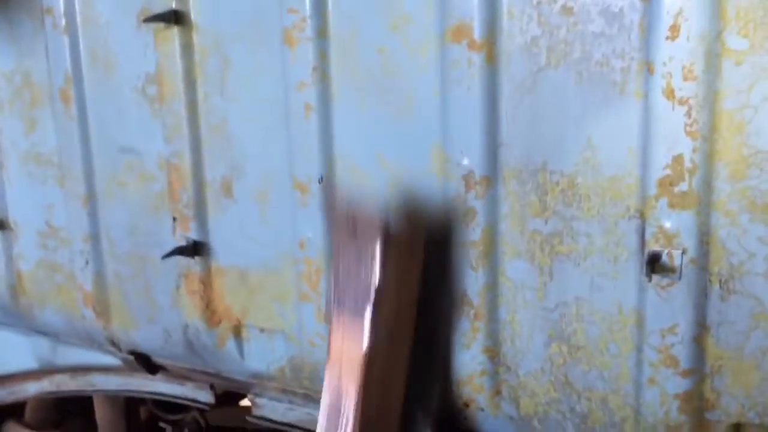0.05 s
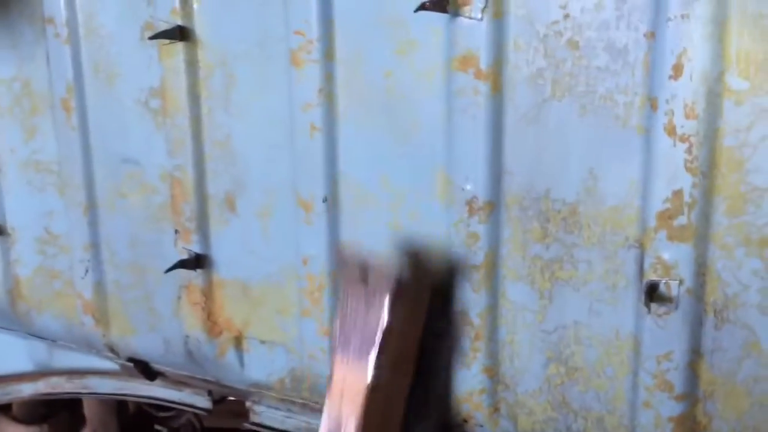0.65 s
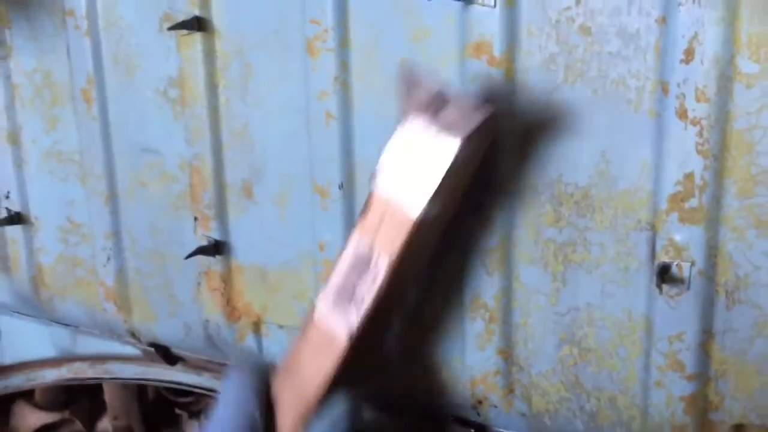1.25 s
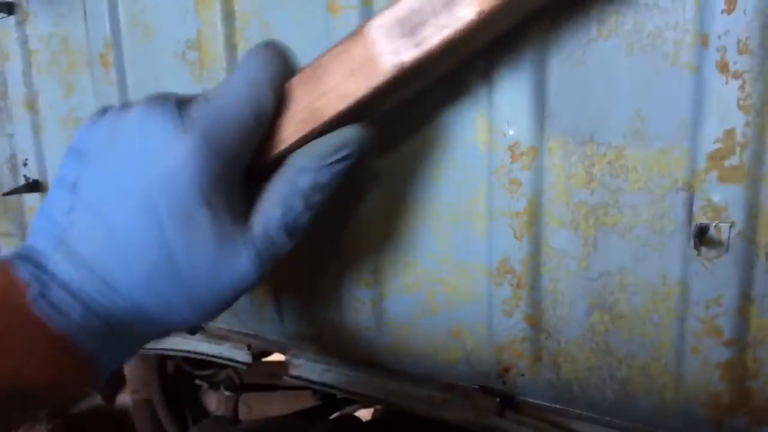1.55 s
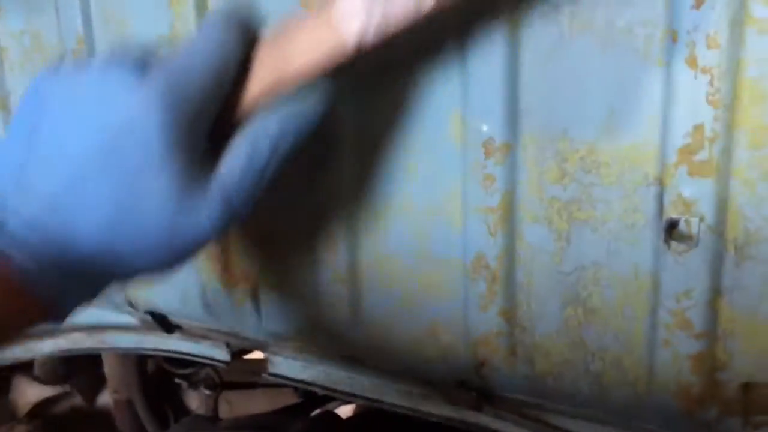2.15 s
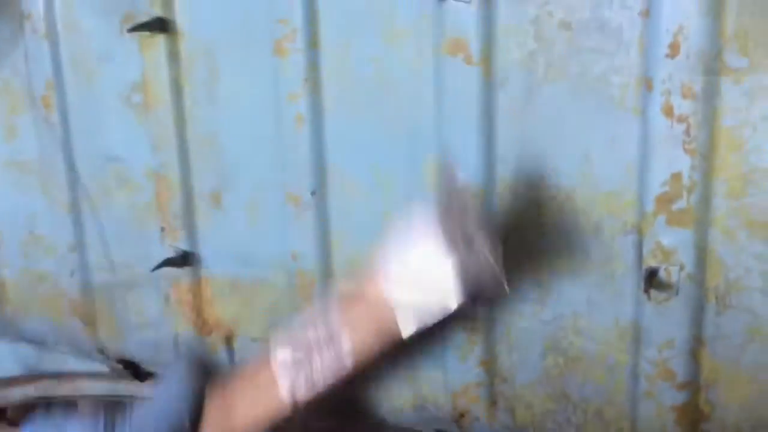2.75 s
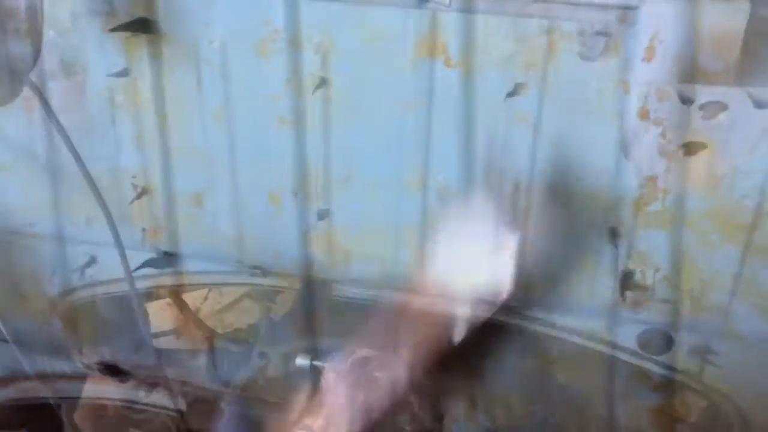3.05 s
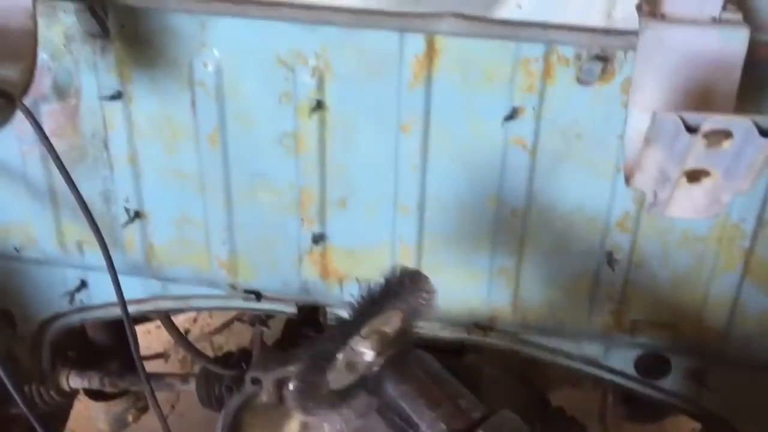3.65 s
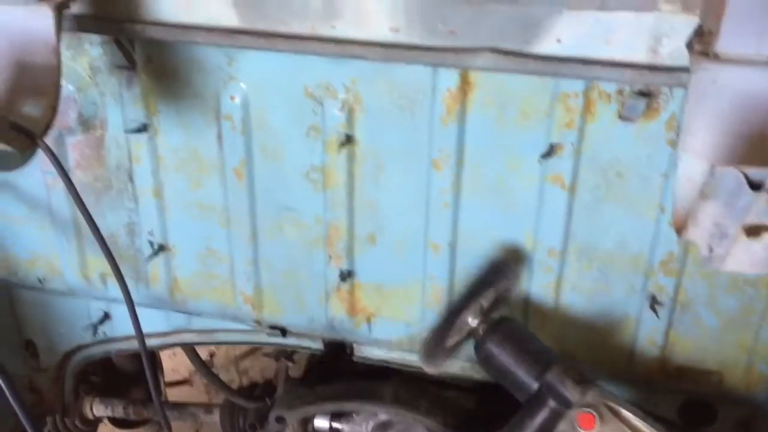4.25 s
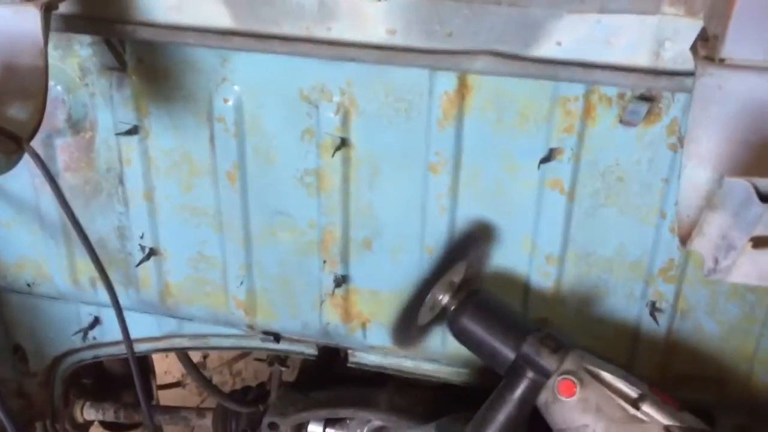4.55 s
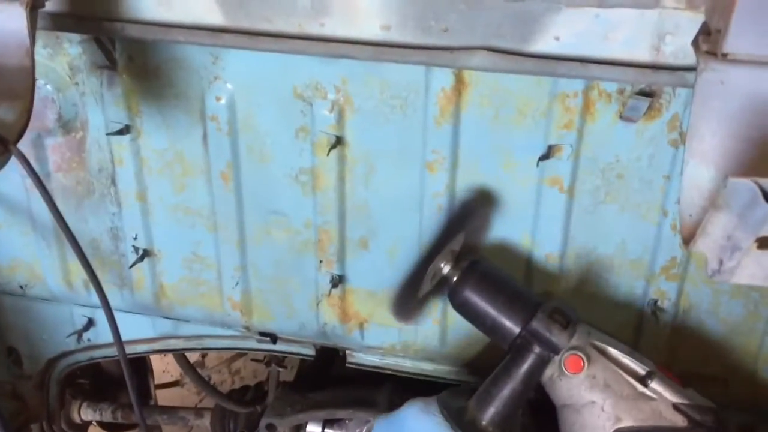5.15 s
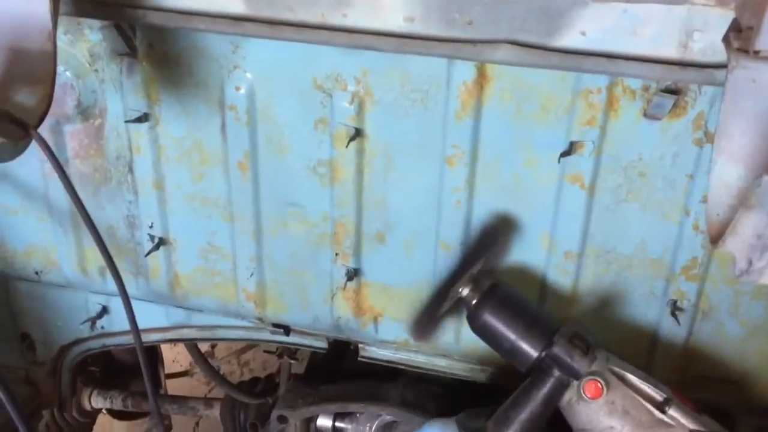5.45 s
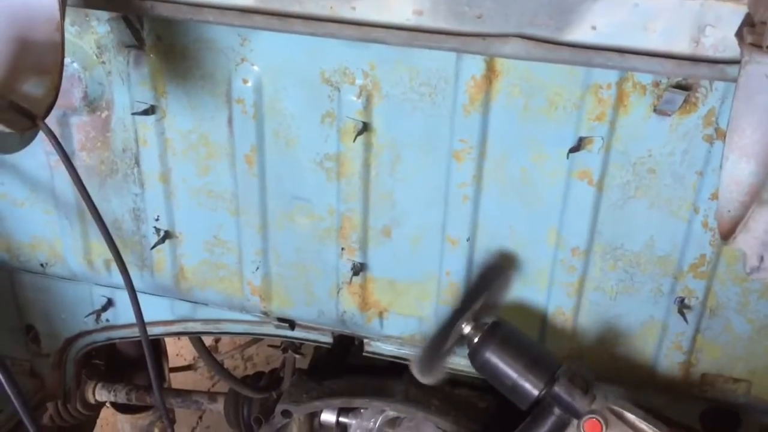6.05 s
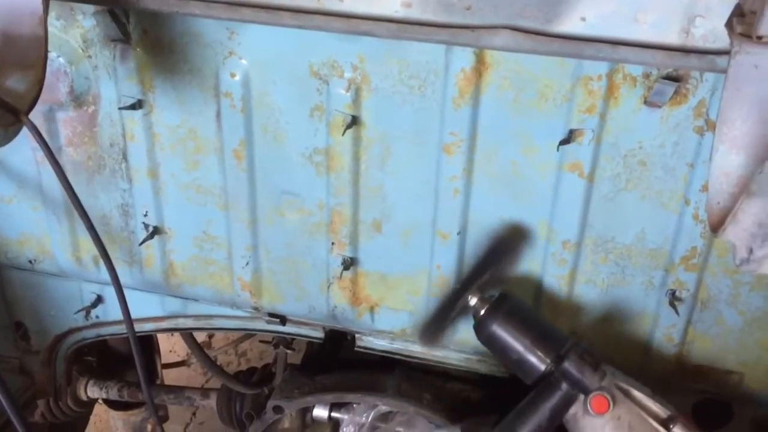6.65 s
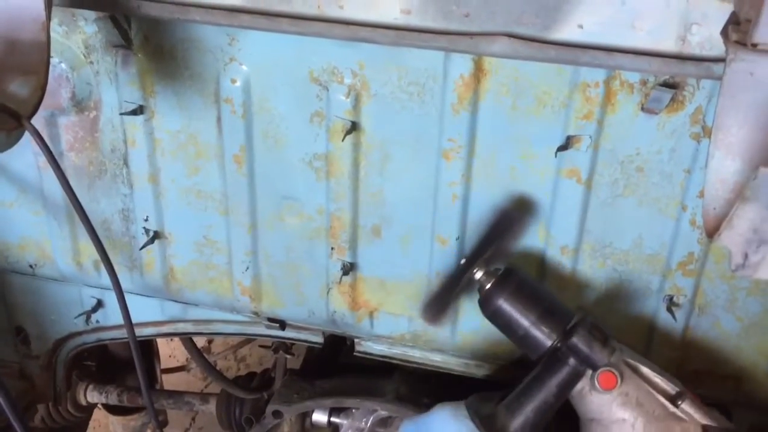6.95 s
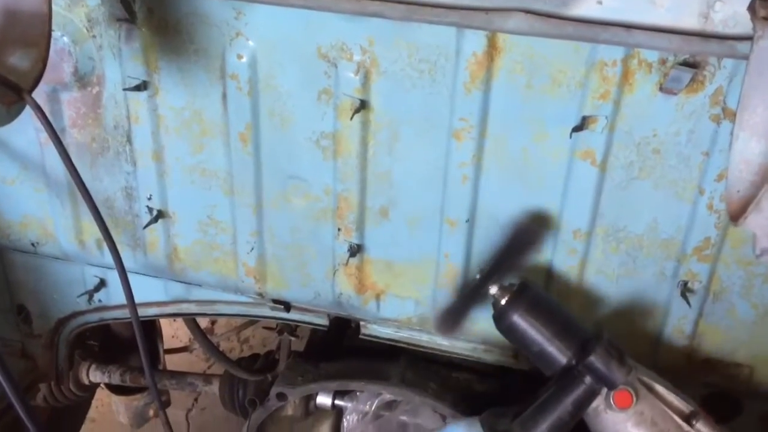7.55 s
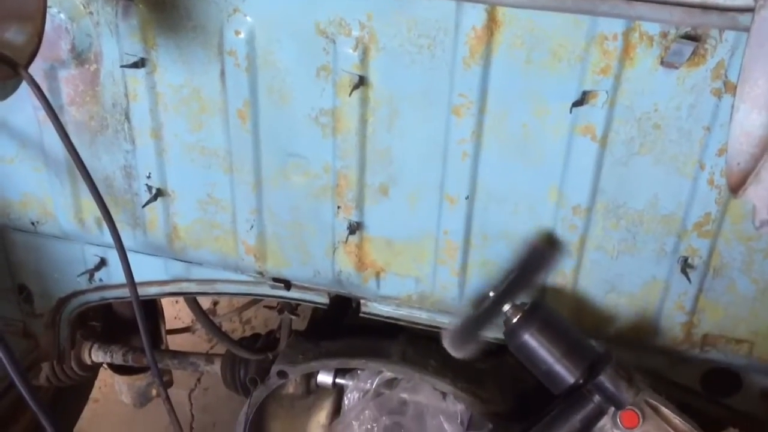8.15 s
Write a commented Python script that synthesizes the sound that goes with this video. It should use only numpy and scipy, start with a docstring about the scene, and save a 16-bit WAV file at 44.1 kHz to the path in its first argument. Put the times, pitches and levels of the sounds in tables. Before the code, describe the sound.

A hand wire brush scrubs a rusty steel panel in quick, scratchy strokes, with a few sharp catches and low thumps from the sheet. The strokes weaken and stop. After a short pause a switch clicks, and a power drill with a wire wheel winds up and runs with a loud, steady hiss and a thin motor whine. Everything is heard close by in a workshop with little echo.

```python
"""In a workshop, close by, a hand wire brush scrubs a rusty steel panel in quick strokes. Stick-slip
friction drives the sound: bristles snag and ring, and whole tufts set the sheet drumming in its low modes.
After a short pause a drill with a wire wheel is switched on, winds up and runs near full speed.
Turbulent air rushes through fan and wires; the motor whines and the gearing throbs at multiples of
their rates of rotation. Both channels are alike."""
import sys
import numpy as np
from scipy import signal
from scipy.fft import rfft, irfft
from scipy.io import wavfile
from scipy.ndimage import uniform_filter1d

SR = 44100
rng = np.random.default_rng(int(sys.argv[2]) if len(sys.argv) > 2 else 0)


def pcm_store(signal):
    """Save signal as 16-bit PCM."""
    levels = np.round(np.clip(np.atleast_2d(signal), -1, 1) * 32767)
    wavfile.write(sys.argv[1], SR, levels.astype(np.int16).T)


N = 369999
TIME = np.arange(N) / SR
TOP_HZ, SWITCH_ON_S = 15850, 4.288

# Hand strokes. Each row: start, fastest moment and end in seconds, scrape level in dB, sizzle and
# hollow ring in dB relative to it, moment of hardest press in seconds, drumming level in dB.
BRUSH_STROKES = [(0, 0.122, 0.26, -25.5, -0.5, -12, .12, -29.5),
                 (0.23, 0.31, 0.45, -28, -4.5, -10.5, .33, -31.5),
                 (0.449, 0.618, 0.72, -27.5, -2, -11.5, .62, -28),
                 (0.713, 0.778, 0.96, -28.5, -3.5, -12.5, .86, -29.5),
                 (0.951, 1.063, 1.179, -23, -1.5, -14, 1.06, -25),
                 (1.293, 1.296, 1.414, -36, -3, -15, 1.33, -29),
                 (1.368, 1.545, 1.676, -29.5, -3.5, -12.5, 1.52, -25.5),
                 (1.633, 1.71, 1.833, -30, 1, -31, 1.71, -23.5),
                 (1.811, 1.873, 1.975, -27, -2, -9, 1.875, -23.5),
                 (1.947, 2.039, 2.153, -26, -1, -21, 2.07, -19.5),
                 (2.144, 2.256, 2.295, -27.5, -2.5, -11, 2.26, -25),
                 (2.278, 2.4, 2.526, -26, -2, -11.5, 2.39, -19.5),
                 (2.519, 2.592, 2.63, -30.5, 0, -9, 2.59, -25.5),
                 (2.606, 2.662, 2.72, -31, 1.5, -26, 2.67, -26),
                 (2.704, 2.776, 2.939, -28, -1.5, -18, 2.8, -22.5),
                 (2.916, 2.95, 3, -42.5, 0, -2, 2.94, -34.5),
                 (2.978, 2.998, 3.13, -31.5, -4, -8, 3.01, -34.5),
                 (3.095, 3.173, 3.265, -29.5, -3.5, -4.5, 3.17, -29.5),
                 (3.27, 3.318, 3.425, -33, -3, -10.5, 3.33, -41.5),
                 (3.419, 3.485, 3.63, -37.5, -3, -8.5, 3.49, -40),
                 (3.718, 3.888, 3.97, -50.5, -10, -31, 3.87, -70)]
# Broad spectrum of bristles on steel. Each row: frequency in Hz, relative level in dB.
SCRATCH_SPECTRUM = [(500, -11), (800, -11), (2500, -2), (7400, -4), (9700, 2), (10400, -0.5), (10700, 1.5),
                    (15500, -0.5)]
# Resonances of sheet and wires. Each row: centre in Hz, width in Hz, height above that spectrum in dB.
SCRATCH_MODES = [(703, 226, 15.2), (874, 48, 9), (1130, 104, 6), (1280, 236, 8.5), (1916, 530, 5),
                 (3000, 53, 2.8), (3640, 920, 2.4), (6220, 150, 1.9), (11440, 1200, 4.1), (13300, 250, 5.7)]
# Broad spectrum of the booming sheet. Each row: frequency in Hz, relative level in dB.
BOOM_SPECTRUM = [(40, -32.5), (90, -2.5), (260, -4), (360, -15), (450, -12), (560, -31), (1200, -55)]
# Low modes of the sheet. Each row: centre in Hz, width in Hz, height above that spectrum in dB.
PANEL_MODES = [(70.3, 8, 13.5), (107, 12.5, 8.5), (138, 20, 8), (245.9, 12, 7.5), (283, 22, 7.5),
               (396, 45, 5.5)]


def undb(db):
    """Decibels as an amplitude ratio."""
    return 10 ** (np.asarray(db) / 20)


def unit(x):
    """Normalisation to an rms of 1."""
    return x / np.sqrt(np.mean(x ** 2))


def curve(rows):
    """Linear interpolation of (seconds, value) rows at every sample."""
    return np.interp(TIME, *np.transpose(rows))


def walk(rate):
    """Smooth random fluctuation of rms 1, with rate new values a second."""
    hold = int(SR / rate)
    steps = np.repeat(rng.standard_normal(N // hold + 1), hold)
    return unit(uniform_filter1d(steps, hold)[:N])


def ring(x, hz, width):
    """A second-order resonance with gain 1 at its centre."""
    return signal.lfilter(*signal.iirpeak(hz, hz / width, fs=SR), x)


def split(x, hz):
    """A crossover: the bands below and above a frequency."""
    return [signal.sosfilt(signal.butter(5, hz, kind, fs=SR, output="sos"), x) for kind in ("low", "high")]


def colour(x, spectrum, modes=(), size=8192):
    """A minimum-phase filter of unit energy: resonance peaks standing on a broad spectrum."""
    f = np.arange(size // 2 + 1) * SR / size
    hz, db = np.transpose(spectrum)
    db = np.interp(np.log(f + 1), np.log(hz), db)
    for centre, width, height in modes:
        db = db + height / (1 + (2 * (f - centre) / width) ** 2)
    cepstrum = irfft(np.log(undb(db)))[:size // 2]
    cepstrum[0] = 0
    response = irfft(np.exp(rfft(2 * cepstrum, size)))
    return signal.fftconvolve(x, response / np.sqrt(np.sum(response ** 2)))[:N]


def fade(start, t60, attack=0.0018):
    """The envelope of a damped vibration: linear rise, exponential decay."""
    age = np.maximum(TIME - start, 0)
    return np.minimum(age / attack, 1) * np.exp(-np.log(1000) * np.minimum(age / t60, 2))


def shop_hum():
    """Stationary noise, strongest at low frequencies, forms the background."""
    # Each row: frequency in Hz, relative spectral density in dB.
    spectrum = [(15, -34.5), (25, -4), (142, -0.5), (231, -17), (952, -18), (1670, -22), (7680, -29),
                (15000, -29)]
    return undb(-60.5) * colour(rng.standard_normal(N), spectrum)


def snags(rate, spread_db):
    """A Poisson process: wire tips let go at rate per second, in impulses of uneven size."""
    sizes = undb(spread_db * np.minimum(rng.exponential(size=N), 4)) * rng.standard_normal(N)
    return unit(sizes * (rng.random(N) < rate / SR) / np.sqrt(rate))


def singing_wires(count=4200, low_hz=1200, t60=0.1, glide=0.017, spread_db=3, size=2048):
    """Free vibration: each released bristle rings briefly at its own, slightly sliding pitch."""
    when, pitch, slide, strength = rng.random((count, 4)).T[:, :, None]
    age = np.arange(size) / SR
    hz = low_hz * (TOP_HZ / low_hz) ** pitch
    cycles = hz * age * (1 + glide * (slide - .5) * age / t60)
    gain = undb(-spread_db * np.log(strength + 0.028))
    pings = np.sin(2 * np.pi * cycles) * gain * np.exp(-np.log(1000) * age / t60)
    samples = (when * N).astype(int) + np.arange(size)
    return unit(np.bincount(samples.ravel(), pings.ravel(), N)[:N])


def hand_brush(rest=0.079, bite=1.18, sharpness=2.08, release_s=0.0048):
    """Friction noise: as a stroke gathers speed, the bristles snag more often and more loudly."""
    speed, scrape, sizzle, hollow = layers = np.zeros((4, N))
    for start, fastest, end, db, sizzle_db, hollow_db, *_ in BRUSH_STROKES:
        now = slice(*np.searchsorted(TIME, [start - .1, end + .1]))
        t = TIME[now]
        progress = np.interp(t, [start, fastest, end], [0, .5, 1])
        arc = np.abs(np.sin(np.pi * progress)) ** sharpness
        creep = rest * np.exp(-np.abs(t - np.clip(t, start, end)) / release_s)  # bent wires at each turn
        stroke = creep + (1 - rest) * np.tanh(bite * arc) / np.tanh(bite)
        gains = undb([0, db, db + sizzle_db, db + hollow_db])
        layers[:, now] = np.maximum(layers[:, now], np.outer(gains, stroke))
    slips = snags(3500 + 9000 * speed, spread_db=-0.5)
    rust = unit(slips * undb(2 * walk(110)))  # rough and smooth patches
    flakes = snags(90, spread_db=4.5) / np.sqrt(speed + 0.22)  # lone ticks stand out at low speed
    grit = rust + .47 * singing_wires() + .13 * flakes
    steel, wires = split(colour(grit, SCRATCH_SPECTRUM, SCRATCH_MODES), hz=8000)
    cavity = ring(rng.standard_normal(N), hz=894, width=77)
    cavity = unit(ring(cavity, hz=883, width=1100))
    wires = unit(wires) * undb(0.58 * walk(45))
    return undb(0.58) * unit(steel) * scrape + undb(3) * (wires * sizzle + cavity * hollow)


def drumming(turn_ease_db=14, lift_db_per_s=303):
    """Forced vibration: tufts stick and slip, driving the sheet hardest where the hand leans in."""
    pressure_db = np.full(N, -np.inf)
    for start, _, end, *_, hardest, db in BRUSH_STROKES:
        ease = turn_ease_db * np.interp(TIME, [start, hardest, end], [1, 0, 1])
        lift = lift_db_per_s * np.abs(TIME - np.clip(TIME, start, end))
        pressure_db = np.maximum(pressure_db, db - ease - lift)
    push = snags(900, spread_db=1.5) * undb(pressure_db)
    return colour(push, BOOM_SPECTRUM, PANEL_MODES)


def thumps(judder_hz=122, uneven=0.081, count=16):
    """Relaxation oscillation: a tuft jams on a rib, shoves the sheet and slips on in weakening jerks."""
    # Each row: start in seconds, first push in dB, time constant of the judder in seconds.
    jams = [(.053, 3.5, 0.053), (.99, 5, 0.04), (1.297, 5.5, 0.0086), (1.829, 3, .02), (2.056, 8, 0.027),
            (2.397, 12, 0.0084), (2.443, 6, 0.029), (2.753, 5.5, 0.014), (2.844, 4.5, 0.023)]
    push = np.zeros(N)
    for start, db, decay in jams:
        gaps = np.exp(uneven * rng.standard_normal(count)) / judder_hz
        age = np.cumsum(gaps) - gaps[0]
        push[((start + age) * SR).astype(int)] += undb(db) * np.exp(-age / decay)
    return colour(push, BOOM_SPECTRUM, PANEL_MODES)


def catches(relative_width=0.14):
    """Impact excitation: wires catch on a rib, giving a broadband clack and a resonant ping."""
    # Each row: start in seconds, clack in dB, ping in dB, ping centre in Hz, 60 dB decay time in seconds.
    knocks = [(0.262, -33, -25, 905, 0.18), (0.373, -50, -24, 9800, 0.14), (0.466, -36, -30, 9100, 0.036),
              (0.742, -29, -31, 1280, .09), (1.196, -37, -25, 11400, 0.084),
              (1.297, -34, -32, 11300, 0.082), (2.215, -24, -28, 1280, .08),
              (2.279, -17.5, -28, 6000, 0.036), (2.296, -12, -21, 3560, 0.029),
              (2.398, -22, -8, 11400, 0.03), (2.436, -25, -21.5, 1280, 0.11),
              (2.834, -20.5, -22.5, 1290, 0.093), (3.115, -38, -31, 2900, 0.092),
              (3.713, -40, -43, 1280, 0.097)]
    scratch = colour(rng.standard_normal(N), SCRATCH_SPECTRUM, SCRATCH_MODES)
    clack = unit(split(scratch, hz=7060)[0])
    noise = rng.standard_normal(N)
    out = np.zeros(N)
    for start, clack_db, ping_db, hz, t60 in knocks:
        ping = unit(ring(noise, hz, relative_width * hz))
        out += fade(start, t60) * (undb(clack_db) * clack + undb(ping_db) * ping)
    return out


def trigger():
    """Damped transients: the switch snaps and the gears take up their backlash."""
    # Each row: start in seconds, level in dB, centre in Hz, width in Hz, 60 dB decay time in seconds.
    clicks = [(4.253, -28.5, 7360, 6000, 0.037), (4.272, -26.5, 1523, 3500, 0.042),
              (4.286, -29, 2500, 6000, 0.069)]
    noise = rng.standard_normal(N)
    return sum(undb(db) * fade(start, t60) * unit(ring(noise, hz, width))
               for start, db, hz, width, t60 in clicks)


def motor_speed(full_hz=404.1, sag_hz_per_s=1.35, spin_up_s=0.125, shape=0.86):
    """Turns per second: a stretched-exponential approach to full speed, then a slow sag."""
    age = np.maximum(TIME - SWITCH_ON_S, 0)
    return (full_hz - sag_hz_per_s * age) * (1 - np.exp(-(age / spin_up_s) ** shape))


def tones(turns, orders, waver_db, waver_rate):
    """Rotational harmonics: (multiple, dB) partials locked to a shaft, each wavering in level."""
    out = np.zeros(N)
    for multiple, db in orders:
        partial = np.sin(2 * np.pi * (multiple * turns + rng.random()))
        out += undb(db) * unit(partial * undb(waver_db * walk(waver_rate)))
    return out


def magnetic_howl(turns, speed, surge):
    """Magnetic forces howl under the starting current and squeak as they sweep through housing modes."""
    # Each row: multiple of the motor speed, relative level in dB.
    orders = [(12, -31.5), (24, -28)]
    # Each row: centre in Hz, width in Hz, gain in dB.
    housing_modes = [(2130, 170, 17), (5520, 350, -1)]
    howl = np.sqrt(2 * speed) * surge ** 3.5 * tones(turns, orders, waver_db=2.5, waver_rate=200)
    return howl + sum(undb(db) * ring(ring(howl, hz, width), hz, width) for hz, width, db in housing_modes)


def air_rush(turns, gear_turns, speed, rest_hz=1230, ease_db_per_s=0.13):
    """Turbulence in fan and wire wheel: a low roar and a hiss, each growing as a power of the speed."""
    # Each row: frequency in Hz, relative level in dB.
    spectrum = [(30, -45), (90, -3.5), (190, -6), (500, -1.5), (900, 1), (2700, .5), (5000, 0),
                (9000, -1.5), (10300, -3), (11300, -1.5), (15500, -3)]
    # Housing and panel resonances. Each row: centre in Hz, width in Hz, height above the spectrum in dB.
    modes = [(390, 102, 7.0), (657, 142, 3.7), (898, 60, 3), (1140, 350, 10), (1345, 230, 5.6),
             (1680, 520, 5.4), (3190, 330, 6.2), (3660, 420, 7.6), (4230, 724, 4.2), (6027, 1300, 7.6),
             (8450, 1958, 6.0), (10950, 300, 4)]
    # The roar shifts as the wheel travels. Each row: time in seconds, pitch in Hz (rest_hz is no shift).
    roar_pitch = [(4.8, 1150), (6.2, 1265), (7.2, 1245)]
    # The air is chopped once a motor turn and sways with the gear cycle.
    chop = 1 + 0.035 * np.sin(2 * np.pi * turns) + 0.021 * np.sin(2 * np.pi * gear_turns)
    roar, hiss = split(colour(rng.standard_normal(N) * chop, spectrum, modes), hz=2160)
    hiss = unit(hiss) * speed ** 1.15 * undb(-16.5 + 0.39 * walk(25))
    pitch_ratio = speed ** .2 * curve(roar_pitch) / rest_hz
    roar = np.interp(np.cumsum(pitch_ratio) / SR, TIME, unit(roar))
    roar_db = -21 - ease_db_per_s * (TIME - SWITCH_ON_S)
    roar = roar * speed ** 1.46 * undb(roar_db + .5 * walk(25))
    return swells(panel_reflections(hiss) + roar)


def panel_reflections(x, count=24, lags_ms=(.7, 4.5), slide_ms=.45, total_db=-14.5):
    """Comb filtering: short paths off the ribbed panel change as the wheel moves, so the peaks slide."""
    # Each row: time in seconds, height of the wheel from 0 (lowest) to 1 (highest).
    wheel_path = [(4.25, 0.3), (5.1, 0.93), (6.0, 0.056), (6.5, 0.045), (7.2, 0.84), (7.75, 0.54),
                  (8.39, 0.26)]
    height = curve(wheel_path)
    gain = undb(total_db) / np.sqrt(count)
    out = x.copy()
    for place, slide, polarity in rng.random((count, 3)):
        lag_ms = np.interp(place, [0, 1], lags_ms) + slide_ms * (2 * slide - 1) * height
        out += np.sign(polarity - .5) * gain * np.interp(TIME - lag_ms / 1000, TIME, x)
    return out


def swells(x):
    """Passing resonances: wheel and housing ring up for a while as the drill is moved."""
    # Each row: peak time and half length in seconds, centre and width in Hz, boost in dB.
    resonances = [(4.52, .1, 3800, 400, 3), (4.85, 0.25, 1100, 300, 2.5), (5.0, .3, 8900, 280, 5),
                  (5.55, .25, 3650, 160, 3.5), (6.3, .35, 8150, 280, 3.5), (7.25, .25, 1270, 220, 2.5),
                  (7.9, .3, 3750, 180, 3), (7.93, .2, 5940, 260, 5)]
    return x + sum((undb(db) - 1) * np.exp(-((TIME - peak) / half) ** 2) * ring(x, hz, width)
                   for peak, half, hz, width, db in resonances)


def motor_whine(turns, speed, fan_blades=8, commutator_bars=30):
    """Shaft harmonics, with tones at the rates at which fan blades and commutator bars pass."""
    # Each row: multiple of the motor speed, level at full speed in dB.
    orders = [(1, -47), (4, -37), (6, -41.5), (7, -41.5), (12, -43), (13, -40), (16, -43), (24, -45),
              (36, -49)]
    # Two tones vary as the drill is turned in the hand. Each row: time in seconds, relative level in dB.
    fan_levels = [(5.7, -37), (6.0, -31), (6.4, -29), (7.3, -37), (8.35, -34)]
    whistle_levels = [(4.6, -39), (4.75, -34.5), (5.85, -38), (5.98, -45), (6.2, -35), (7.0, -33.5),
                      (7.4, -38.5), (7.6, -32.5), (7.8, -30), (7.92, -34), (8.12, -31), (8.35, -40)]
    fan = undb(curve(fan_levels)) * tones(turns, [(fan_blades, 0)], waver_db=1.5, waver_rate=12)
    whine = tones(turns, orders, waver_db=2, waver_rate=5)
    whistle = tones(turns, [(commutator_bars, 0.8)], waver_db=1.8, waver_rate=16)
    return speed ** 8 * (fan + whine) + speed ** 5 * undb(curve(whistle_levels)) * whistle


def gear_rumble(gear_turns, speed):
    """Low harmonics of the gear cycle beat together and come in near full speed."""
    # Each row: multiple of the gear cycle, relative level in dB.
    orders = [(4, -8.5), (5, -6.5), (7, -12), (10, -6.5), (16, -15), (17, -15.5)]
    # Each row: time in seconds, relative level in dB.
    levels = [(4.62, -51), (5.1, -35), (5.74, -34.5), (6.44, -43), (6.94, -32), (7.64, -32.5), (8.33, -39)]
    rumble = tones(gear_turns, orders, waver_db=0.5, waver_rate=2.63)
    return speed ** 4.5 * undb(curve(levels) - 1.5) * rumble


def drill(jitter=0.00053, wander=0.000416, gear_ratio=28):
    """Phase locking: one slightly unsteady shaft drives the rush, the whine, the gears and the howl."""
    hz = motor_speed()
    speed = hz / hz.max()
    surge = 4 * speed * (1 - speed)  # the starting surge peaks at half speed
    judder = .019 * surge ** 2 * walk(400)
    turns = np.cumsum(hz * (1 + jitter * walk(60) + wander * walk(2) + judder)) / SR
    gear_turns = turns / gear_ratio
    return (air_rush(turns, gear_turns, speed) + motor_whine(turns, speed)
            + gear_rumble(gear_turns, speed) + magnetic_howl(turns, speed, surge))


def workshop(x, near_db, far_db=-23):
    """Reverberation: early reflections off nearby metal, then a short tail, both weak in the bass."""
    near = fade(0.0011, t60=0.12) * ring(rng.standard_normal(N), hz=3300, width=4600)
    far = fade(0.011, t60=0.28) * ring(rng.standard_normal(N), hz=1280, width=2700)
    echoes = sum(undb(db) * response[:SR] / np.sqrt(np.sum(response ** 2))
                 for db, response in ((near_db, near), (far_db, far)))
    return undb(0.06) * (x + signal.fftconvolve(x, echoes)[:N])


def scene():
    """Superposition: hand work, then the drill, over the hum of the shop."""
    by_hand = workshop(hand_brush() + drumming() + thumps() + catches(), near_db=-18.5)
    by_drill = workshop(trigger() + drill(), near_db=-14.5)
    mono = by_hand + by_drill + shop_hum()
    return np.array([mono, mono])


def record(dry):
    """Soft saturation rounds the tallest peaks, and a steep low-pass cuts the top."""
    rounded = dry / (1 + dry ** 6) ** (1 / 6)
    return signal.sosfilt(signal.ellip(12, .1, 80, TOP_HZ, fs=SR, output="sos"), rounded)


dry = scene()
out = record(dry)
pcm_store(out)
```